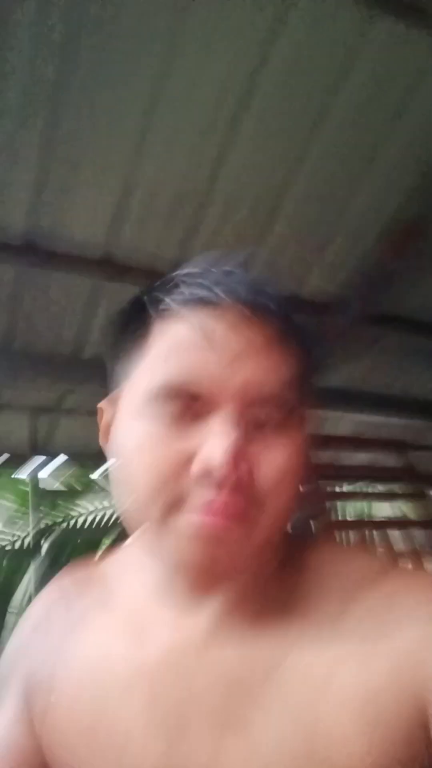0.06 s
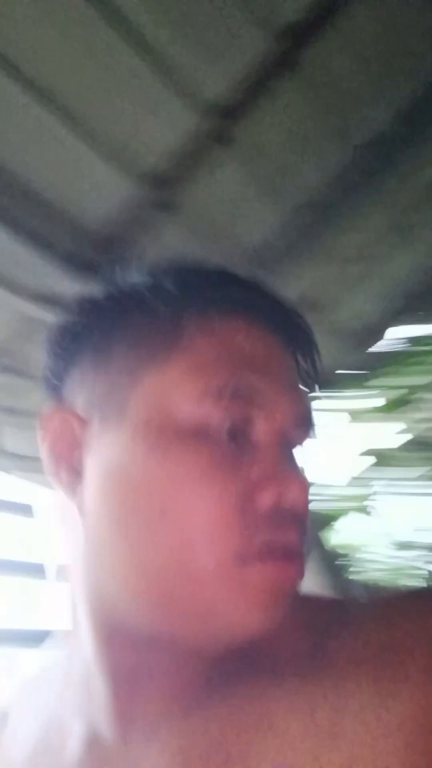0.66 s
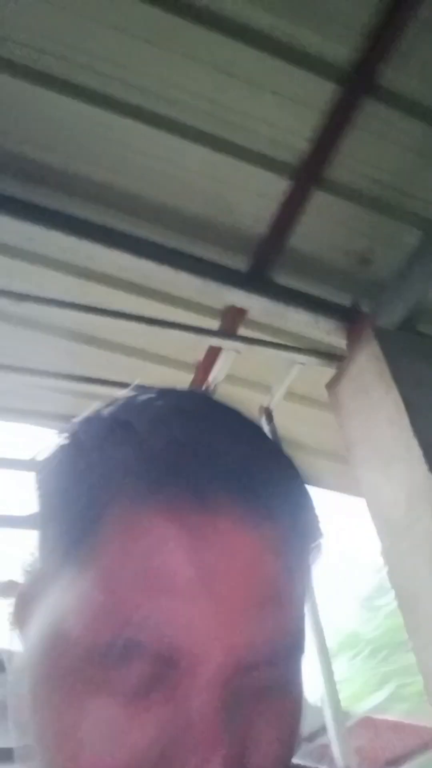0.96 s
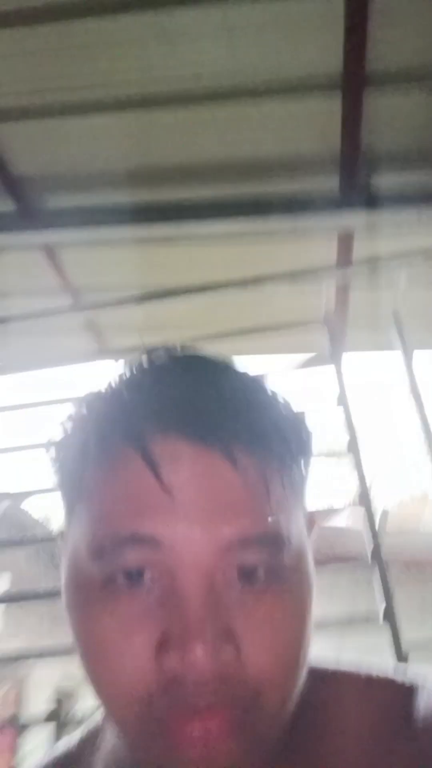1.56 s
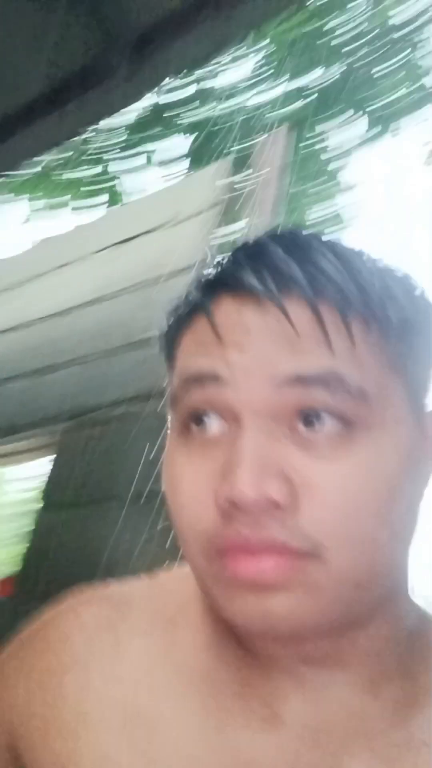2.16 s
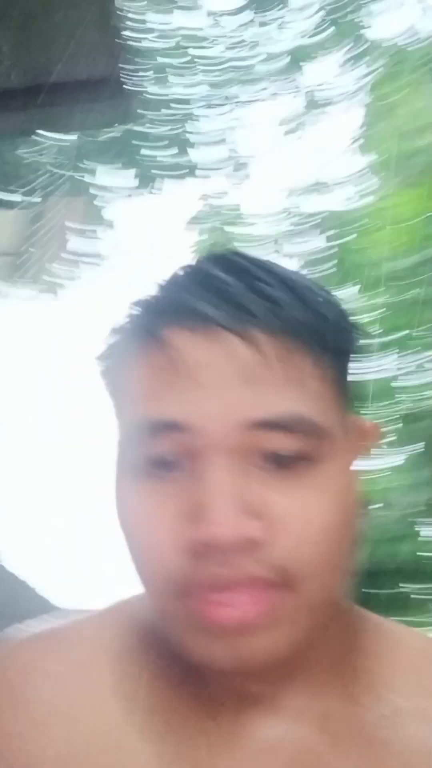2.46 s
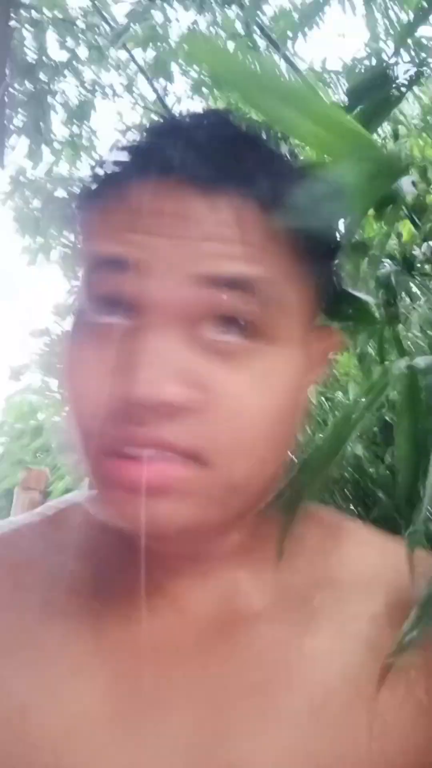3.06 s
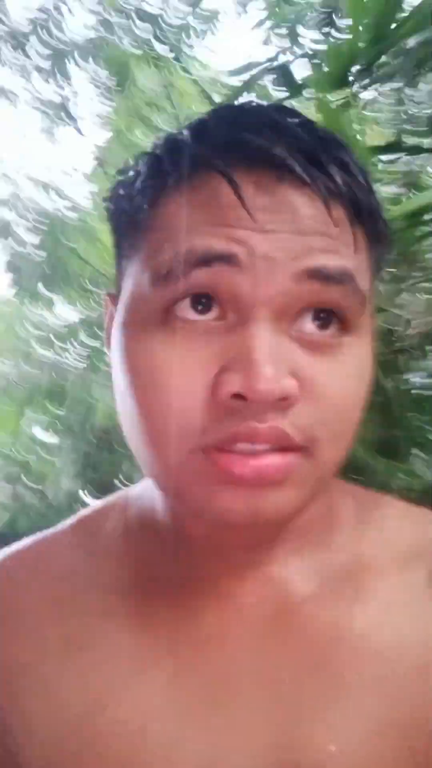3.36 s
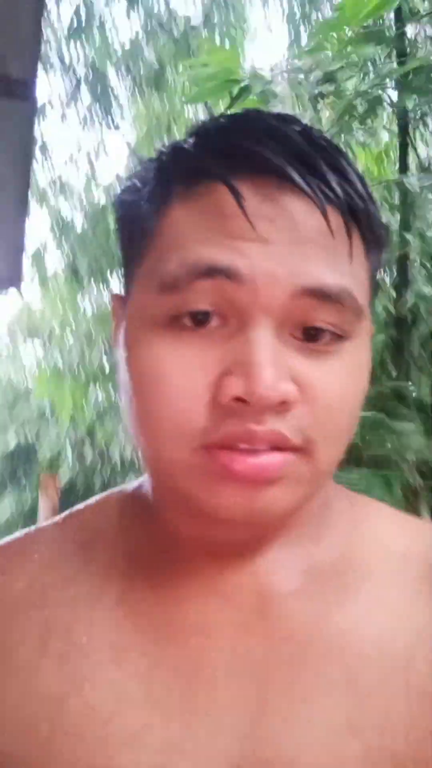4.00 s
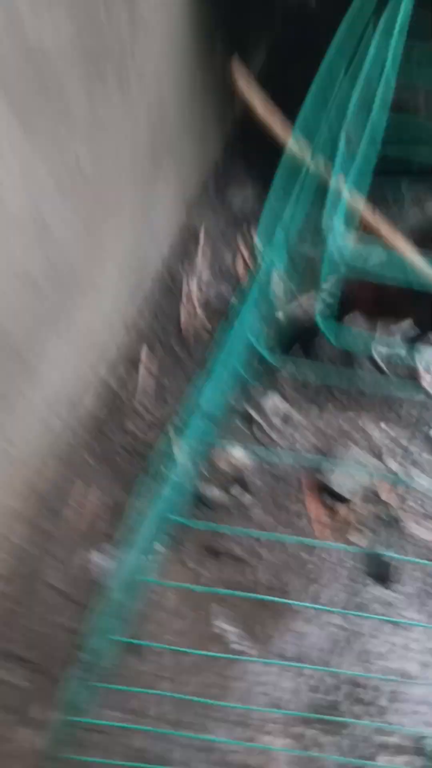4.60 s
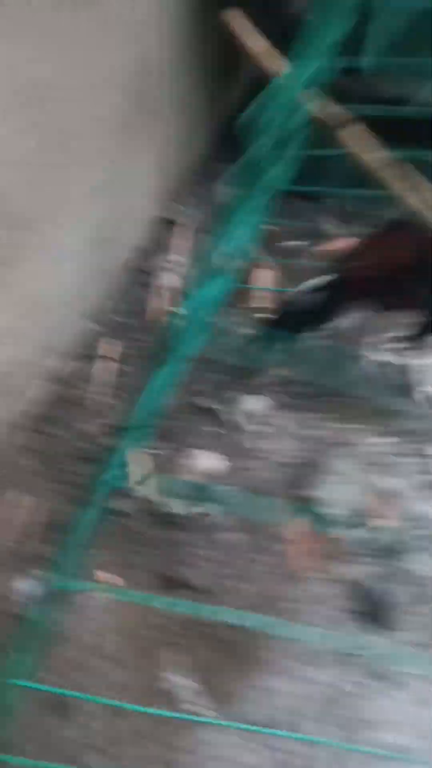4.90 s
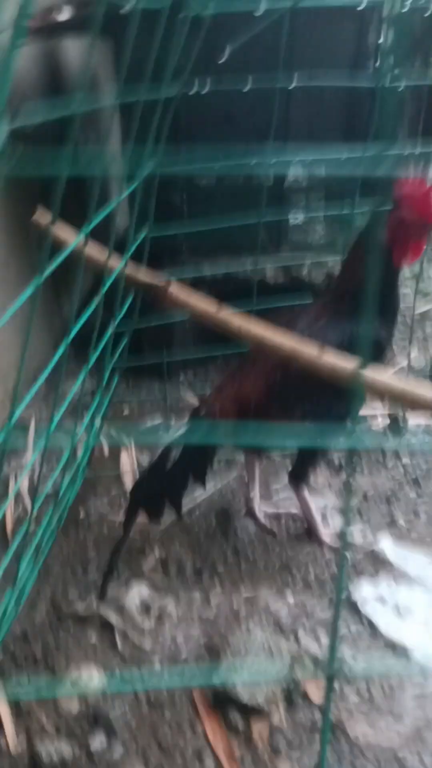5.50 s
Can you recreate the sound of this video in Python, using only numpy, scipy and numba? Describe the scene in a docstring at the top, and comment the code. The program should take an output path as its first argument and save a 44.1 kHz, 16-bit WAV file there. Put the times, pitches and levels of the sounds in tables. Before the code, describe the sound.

A downpour rattles on metal roofing and spatters on leaves; the microphone is bumped and briefly covered, and softer rain follows.

```python
"""Downpour on a sheet-metal roof

A phone is carried from under the roof, out beside wet foliage, and down to a cage. Dense drops ring
the sheets and spatter on leaves and ground, and run-off splashes from the eaves. Knocks on the phone
make its limiter duck the rain. A finger shuts the microphone port, then the rain returns, quieter."""
import sys
import numpy as np
from scipy import signal
from scipy.fft import rfft, irfft, next_fast_len
from scipy.io import wavfile
from scipy.ndimage import uniform_filter1d, minimum_filter1d
from numba import njit

SR = 44100
rng = np.random.default_rng(int(sys.argv[2]) if len(sys.argv) > 2 else 0)


def wrap_up_sound(samples):
    """Save the sound to the file named by the first command line argument, as 16-bit audio."""
    columns = np.atleast_2d(samples).T
    # keep every value between -1 and 1, then stretch to whole-number steps
    tamed = np.clip(columns, -1, 1)
    steps = np.round(tamed * 32767).astype(np.int16)
    wavfile.write(sys.argv[1], SR, steps)


N = 249165
TIME = np.arange(N) / SR
# Cues: the spatter opens up, the phone leaves the shelter, the phone turns down to the cage
CLEAR_S, STEP_OUT_S, TURN_DOWN_S = 1.978, 2.03, 4.56


def undb(db):
    """Decibels to gain."""
    return 10 ** (np.asarray(db) / 20)


def unit(x):
    """Scale to rms 1."""
    return x / np.sqrt(np.mean(x ** 2))


def add(track, start_s, sound):
    """Mix a one-shot in on its cue."""
    i = int(start_s * SR)
    track[i:i + len(sound)] += sound[:N - i]


def colour(x, eq):
    """Minimum-phase EQ through (frequency [Hz], level [dB]) points; output at rms 1."""
    hz, db = np.transpose(eq)
    size = next_fast_len(N + 8192, real=True)
    bins_hz = np.maximum(np.arange(size // 2 + 1) * SR / size, 1)
    gain = undb(np.interp(np.log(bins_hz), np.log(hz), db))
    cepstrum = irfft(np.log(gain), size)
    cepstrum[size // 2:] = 0  # no ringing ahead of a hit
    response = np.exp(2 * rfft(cepstrum))
    return unit(irfft(rfft(x, size) * response, size)[:N])


@njit
def resonate(x, hz, width_hz):
    """State-variable band-pass whose centre can sweep."""
    out, band, low = np.empty(len(x)), 0., 0.
    for i in range(len(x)):
        tuning, damping = np.tan(np.pi * hz[i] / SR), width_hz / hz[i]
        v = (band + tuning * (x[i] - low)) / (1 + tuning * (tuning + damping))
        band, low = 2 * v - band, low + 2 * tuning * v
        out[i] = damping * v
    return out


def steep_band(x, hz, width_hz):
    """Two matching resonances in series, for steeper skirts."""
    centre = hz * np.ones(len(x))
    return resonate(resonate(x, centre, float(width_hz)), centre, float(width_hz))


def flicker(rate_hz):
    """Smooth random modulation at rms 1."""
    hold = int(SR / rate_hz)
    steps = np.repeat(rng.standard_normal(N // hold + 1), hold)[:N]
    return unit(uniform_filter1d(uniform_filter1d(steps, hold), hold))


def pass_by(nearest_s, peak_db, rise_db_per_s, fall_db_per_s):
    """Gain of a source that swells as the phone nears it and fades behind it."""
    before, after = np.maximum(nearest_s - TIME, 0), np.maximum(TIME - nearest_s, 0)
    return undb(peak_db - rise_db_per_s * before - fall_db_per_s * after)


@njit
def ring(starts, poles, amplitudes, lengths):
    """Sum of damped sines, one for each drop."""
    out = np.zeros(N)
    for k in range(len(starts)):
        phasor = amplitudes[k]
        for i in range(starts[k], min(N, starts[k] + lengths[k])):
            out[i] += phasor.real
            phasor *= poles[k]
    return out


def drops(count, top_hz, t60_s, spread_db):
    """Drops ping at random times and pitches; positive spread makes a few louder, negative softer."""
    when, pitch, sustain, size, phase = rng.random((count, 5)).T
    length = t60_s * SR * (.5 + sustain)
    poles = np.exp(2j * np.pi * pitch * top_hz / SR - np.log(1000) / length)
    amplitudes = undb(-spread_db * np.log(1 - .99 * size)) * np.exp(2j * np.pi * phase)
    return unit(ring((when * N).astype(np.int64), poles, amplitudes, length.astype(np.int64) + 1))


# Sizzle of the spatter, as the microphone port colours it (frequency [Hz], relative level [dB])
SPATTER_EQ = [(2500, -16.5), (3700, -0.5), (4600, 3.5), (5700, -3), (6700, 3), (7700, -2), (9100, 0),
              (10200, -7.5), (11300, -12), (13100, -6.5), (15800, -11.5)]


def spatter():
    """A bed of fine splashes on leaves and ground, with crisper ticks from the nearest ones."""
    far = drops(count=110000, top_hz=17330, t60_s=0.0035, spread_db=-0.5)
    near = drops(count=900, top_hz=17000, t60_s=.0008, spread_db=2.0)
    return colour(far + undb(-15.5) * near, SPATTER_EQ) * undb(0.5 * flicker(rate_hz=23))


# Bright splash along the shelter's open side (frequency [Hz], relative level [dB])
RUNOFF_EQ = [(2200, -15), (3400, 0.5), (4500, -3.5), (6000, -5), (7500, -10), (10000, -41)]


def runoff():
    """Water falls from the eaves in strings and splashes."""
    splashes = drops(count=55000, top_hz=11020, t60_s=0.0069, spread_db=-1.5)
    return colour(splashes, RUNOFF_EQ) * undb(0.3 * flicker(rate_hz=32))


def wobble(hz, cycles):
    """The phone rocks in the hand: low swings that swell fast and die out; peak 1."""
    age = np.linspace(0, 1, int(SR * cycles / hz))
    swing = age * (1 - age) ** 1.3 * np.sin(2 * np.pi * cycles * age)
    return swing / np.abs(swing).max()


# Dull handling thumps (time [s], knock level [dB], upper band edge [Hz], wobble level [dB])
BODY_KNOCKS = [(0.689, 0, 450, -23), (1.0252, 3, 278, -13), (1.929, 1, 440, -22), (1.9458, 5.5, 377, -14),
               (2.012, 2.5, 476, 4.5), (2.065, 0, 540, -2.5), (2.116, 6.5, 512, 4), (2.4697, -4, 380, -14),
               (3.084, -16, 330, -29), (3.979, -2, 330, -9.5), (4.3576, 13, 300, -11.5),
               (4.4403, 14.5, 243, 3), (4.957, 12, 850, -11)]


def knocks(low_hz=105, wobble_hz=116, wobble_lag_s=0.00051):
    """A push on the case comes through as a band of bass, the lowest part last, then a wobble."""
    out, push = np.zeros(N), signal.unit_impulse(SR // 16)
    for start_s, knock_db, top_hz, wobble_db in BODY_KNOCKS:
        body = signal.butter(3, [low_hz, top_hz], "bandpass", fs=SR, output="sos")
        knock = signal.sosfilt(body, push)
        add(out, start_s, undb(knock_db) * knock / np.abs(knock).max())
        add(out, start_s + wobble_lag_s, -undb(wobble_db) * wobble(wobble_hz, cycles=2.06))
    return out


# Clicks on the case and close drops (time [s], level [dB], pitch [Hz], bandwidth [Hz], decay [s])
SHARP_TAPS = [(0.0241, 18.5, 1400, 1290, .0009), (1.562, -18, 9000, 7000, .004),
              (2.49, -16, 13000, 6000, .002), (4.3695, 16.5, 1300, 2200, 0.00046),
              (4.686, -25.5, 4000, 8000, 0.0009), (4.715, -29, 2500, 4000, .001),
              (4.9562, -1, 4000, 9000, .0007), (4.9574, 16.5, 680, 800, 0.0026),
              (5.572, -20, 12000, 7000, .001), (5.612, -12, 6500, 8000, .003)]


def taps(blow_gain=5.4):
    """A sharp blow and a brief rough contact ring one broad resonance."""
    out, t = np.zeros(N), TIME[:SR // 32]
    blow = blow_gain * signal.unit_impulse(len(t))
    for start_s, peak_db, hz, width_hz, decay_s in SHARP_TAPS:
        grit = rng.standard_normal(len(t)) * np.exp(-t / decay_s)
        tap = steep_band(blow + grit, hz, width_hz)
        add(out, start_s, undb(peak_db) * tap / np.abs(tap).max())
    return out


# Brief dips in the rain (time [s], half-width [s], depth [dB])
RAIN_DIPS = [(.75, 0.073, -2), (1.945, .03, -1.5), (3.147, 0.096, -2), (4.953, 0.0082, -20)]


def microphone_port(shut_s=4.476, lift_s=4.642, leak_db=-50, seal_db_per_s=700, reopen_s=0.064):
    """Gain on the rain: it fades in, dips now and then, is choked by the finger and eases back."""
    fade_in_db = np.interp(TIME, [0, 0.11], [-7.5, 0])
    dips_db = sum(db * np.exp(-((TIME - s) / half_width) ** 2) for s, half_width, db in RAIN_DIPS)
    pressed_db = (TIME > shut_s) * (leak_db - seal_db_per_s * (TIME - shut_s))
    lifted_db = leak_db * np.exp(-np.maximum(TIME - lift_s, 0) / reopen_s)
    return undb(fade_in_db + dips_db + np.where(TIME < lift_s, pressed_db, lifted_db))


# Roof tone from underneath, from outside and at the cage (frequency [Hz], relative level [dB])
ROOF_UNDER_EQ = [(24, -45), (40, -31), (160, -6.5), (302, -7.5), (360, -5), (396, -7.5), (539, -6),
                 (793, -4), (1190, -4.5), (1590, -3.5), (1890, -4), (2880, -15), (4000, -29), (5200, -46),
                 (8800, -120)]
ROOF_OUTSIDE_EQ = [(24, -48), (40, -29), (210, 1), (471, -4), (529, -2), (605, -3), (763, -1.5),
                   (925, -2.5), (1310, 2), (2290, 1), (3560, -15), (4000, -19), (5200, -42.5), (8800, -120)]
ROOF_CAGE_EQ = [(24, -65), (40, -38), (97, -15.5), (176, -11.5), (249, -6), (275, -4), (360, -4.5),
                (396, -6.5), (539, -11), (641, -5), (720, -13), (793, -7), (1140, -4), (2240, -3.5),
                (4000, -25), (5200, -43), (8800, -120)]
# Drifting upper ring of the sheet overhead (time [s], centre [Hz])
UPPER_RING_SWEEP = [(0.2, 1650), (0.852, 1550), (1.058, 1700), (1.85, 1734)]


def roof():
    """Drops drum on the metal sheets; the one overhead rings out until the phone leaves the shelter."""
    sheets = drops(count=70000, top_hz=4598, t60_s=.02, spread_db=1.74)
    overhead = drops(count=24000, top_hz=2989, t60_s=0.022, spread_db=1.2)
    upper_hz = np.interp(TIME, *np.transpose(UPPER_RING_SWEEP))
    upper_ring = unit(steep_band(overhead, upper_hz, width_hz=700))
    upper_ring *= pass_by(nearest_s=1.8, peak_db=-2, rise_db_per_s=4, fall_db_per_s=32.5)
    lower_ring = unit(steep_band(overhead, hz=795, width_hz=210))
    lower_ring *= pass_by(nearest_s=1.1, peak_db=-11.5, rise_db_per_s=31, fall_db_per_s=6)
    under = undb(-1.8) * colour(sheets, ROOF_UNDER_EQ)
    outside = colour(sheets, ROOF_OUTSIDE_EQ)
    crossfade = np.clip((TIME - STEP_OUT_S) / 0.17 + .5, 0, 1)
    before_cage = (1 - crossfade) * under + crossfade * outside + upper_ring + lower_ring
    return np.where(TIME > TURN_DOWN_S, colour(sheets, ROOF_CAGE_EQ), before_cage)


def scene():
    """The rain mix follows the phone and enters by the port; knocks and taps bypass it."""
    spatter_db = np.where(TIME < CLEAR_S, -32.5, -23.5)
    runoff_gain = pass_by(nearest_s=1.3, peak_db=-23, rise_db_per_s=6.5, fall_db_per_s=4.5)
    splashing = undb(spatter_db) * spatter() + runoff_gain * runoff()
    roof_db = np.where(TIME < STEP_OUT_S, -6 - 1.5 * TIME, -8.5)  # fades towards the roof's edge
    drumming = undb(roof_db) * roof()
    at_cage = TIME > TURN_DOWN_S  # the wall by the cage screens both layers
    rain = undb(-7 * at_cage) * drumming + undb(-9 * at_cage) * splashing
    return (rain * microphone_port() + knocks() + taps())[None]


def limiter(x, ceiling_db, release_s):
    """Looks a millisecond ahead, ducks at once on a peak and lets the gain creep back."""
    ahead = SR // 1000
    peak = -minimum_filter1d(-np.abs(x), 2 * ahead)
    overshoot = np.log(np.maximum(peak / undb(ceiling_db), 1))
    reduction = np.maximum.accumulate(overshoot + TIME / release_s) - TIME / release_s
    return x * np.exp(-uniform_filter1d(reduction, ahead))


def record(dry, top_hz=15950):
    """The phone limits the level, clips the remaining peaks and cuts the top end."""
    clipped = np.clip(limiter(dry[0], ceiling_db=0.34, release_s=0.042), -1, 1)
    high_cut = signal.ellip(10, .2, 70, top_hz, fs=SR, output="sos")
    return signal.sosfilt(high_cut, clipped)[None]


dry = scene()
out = record(dry)
wrap_up_sound(out)
```